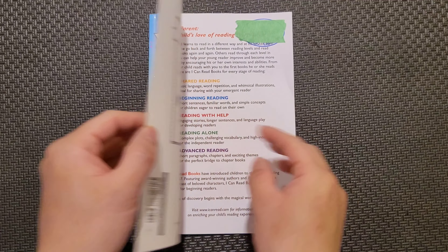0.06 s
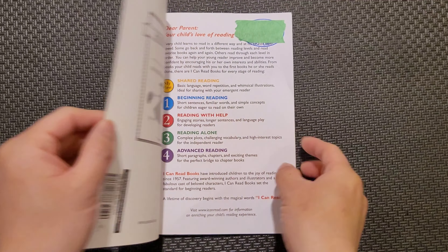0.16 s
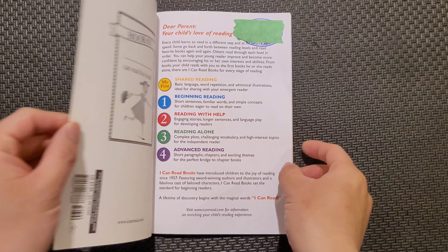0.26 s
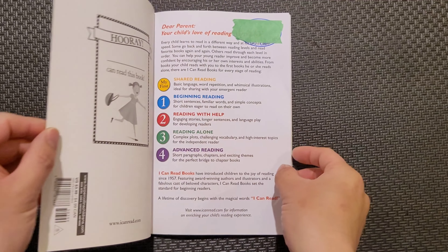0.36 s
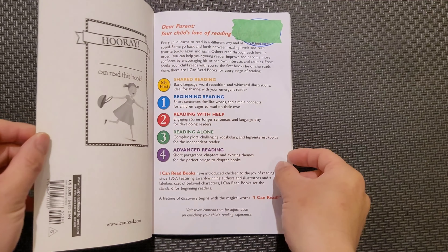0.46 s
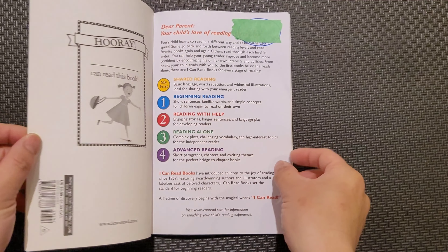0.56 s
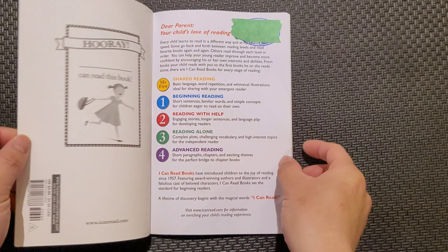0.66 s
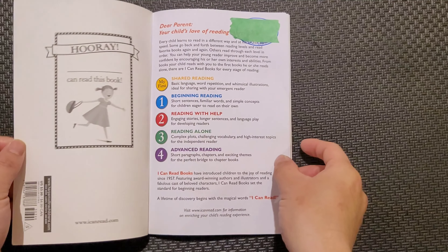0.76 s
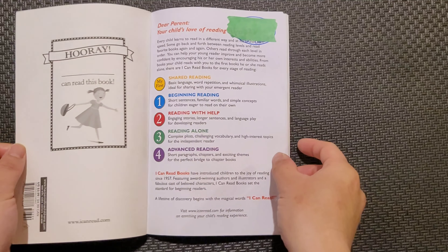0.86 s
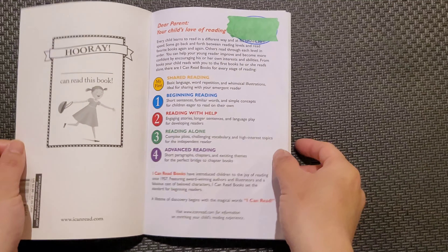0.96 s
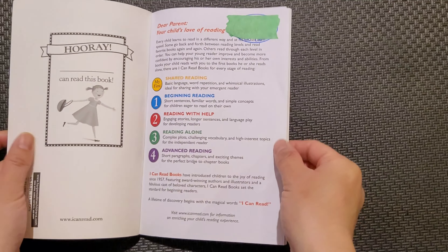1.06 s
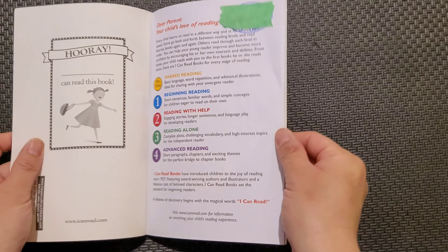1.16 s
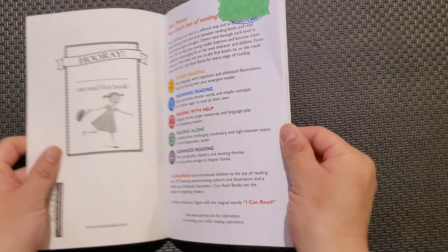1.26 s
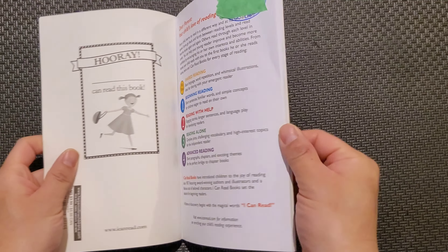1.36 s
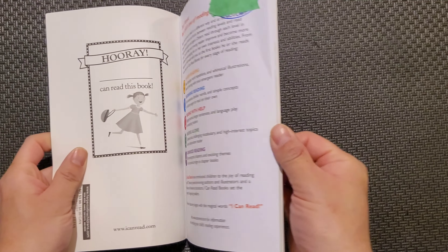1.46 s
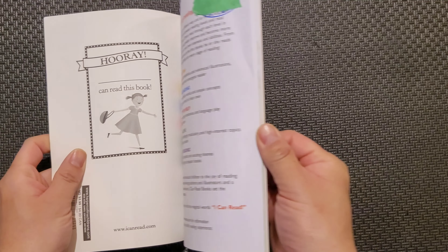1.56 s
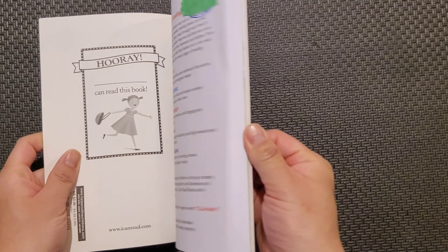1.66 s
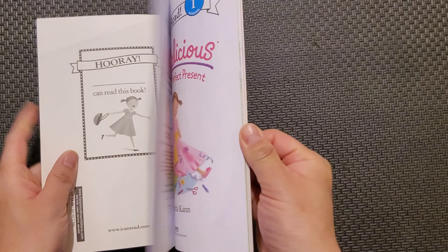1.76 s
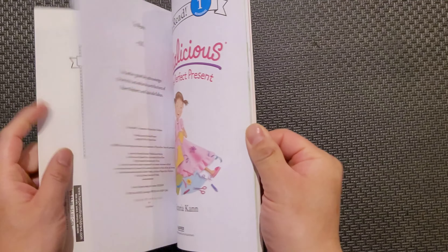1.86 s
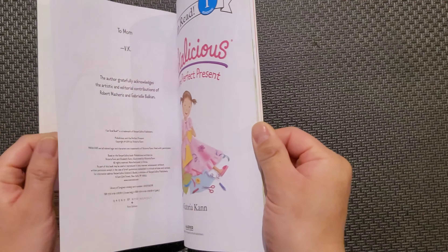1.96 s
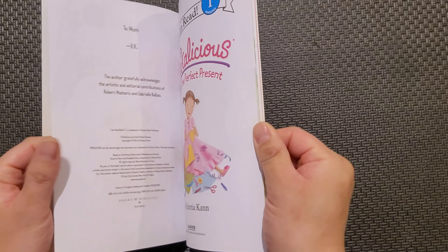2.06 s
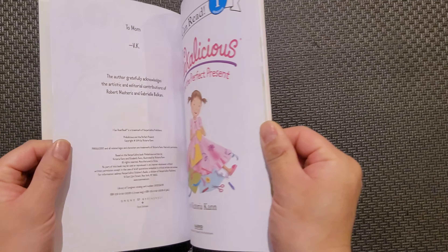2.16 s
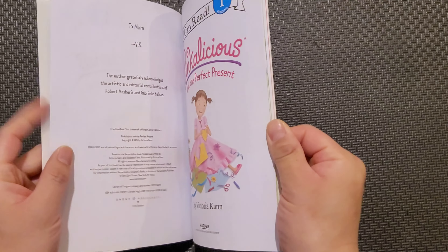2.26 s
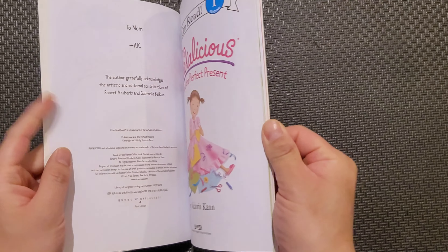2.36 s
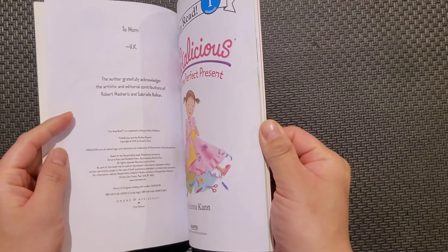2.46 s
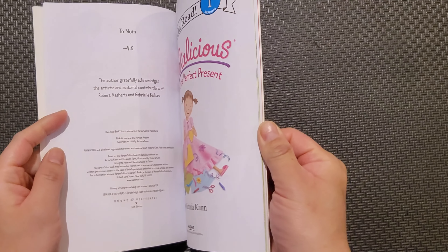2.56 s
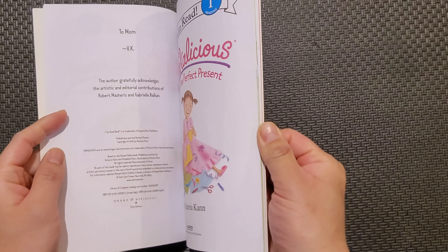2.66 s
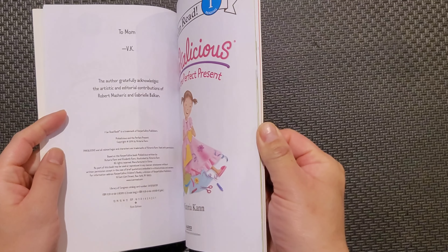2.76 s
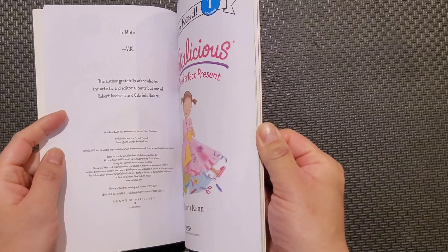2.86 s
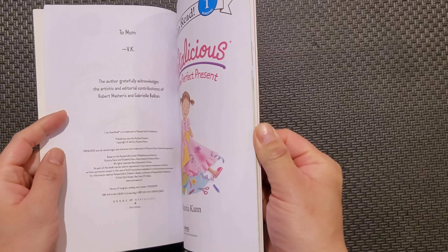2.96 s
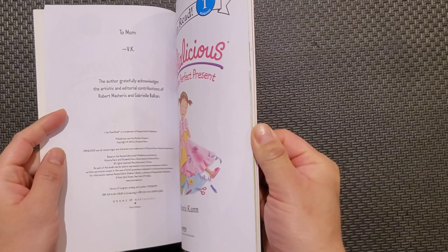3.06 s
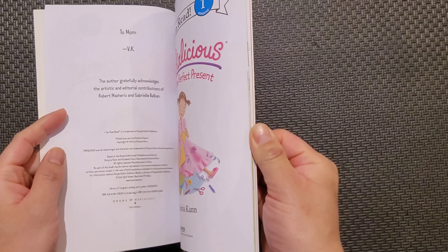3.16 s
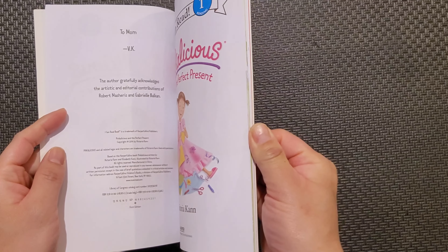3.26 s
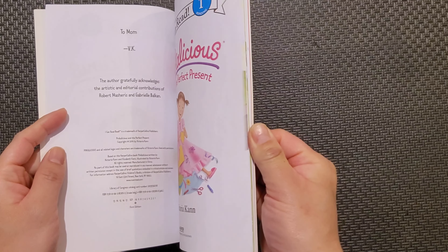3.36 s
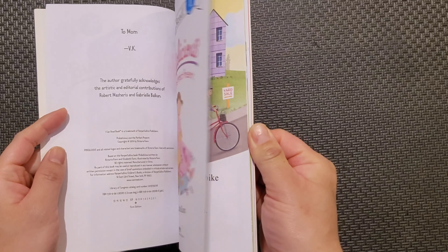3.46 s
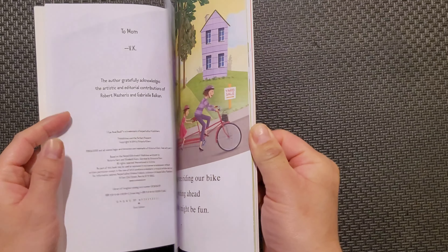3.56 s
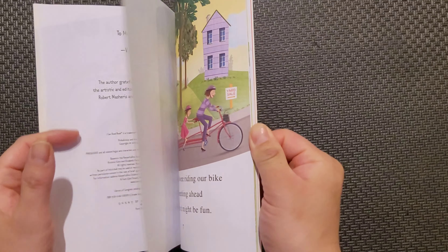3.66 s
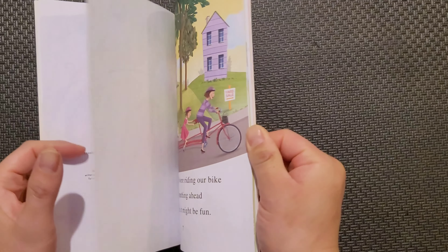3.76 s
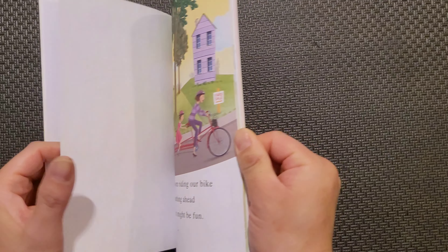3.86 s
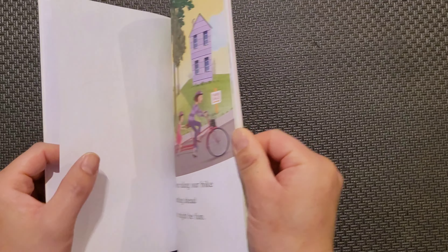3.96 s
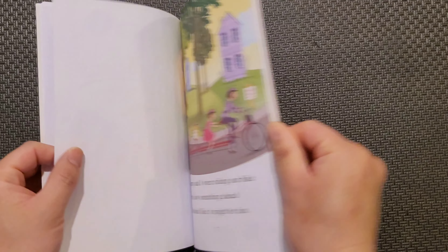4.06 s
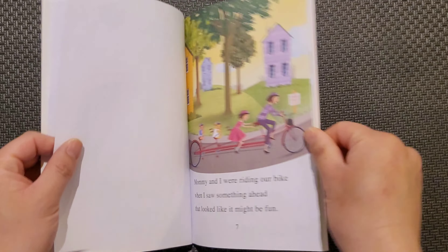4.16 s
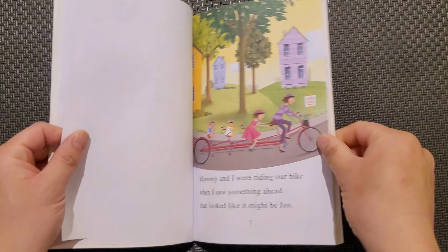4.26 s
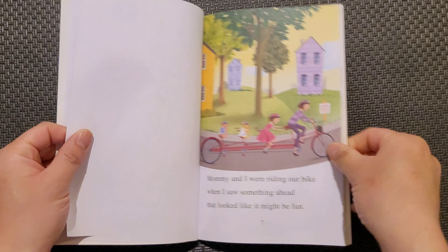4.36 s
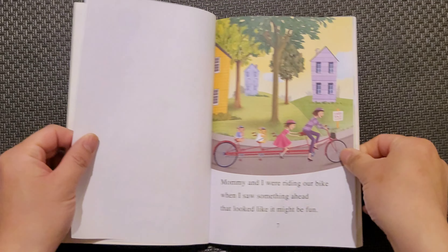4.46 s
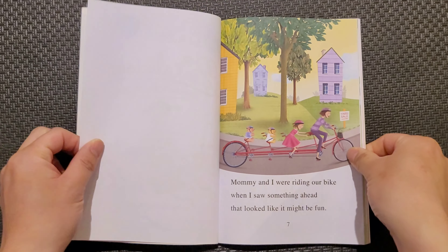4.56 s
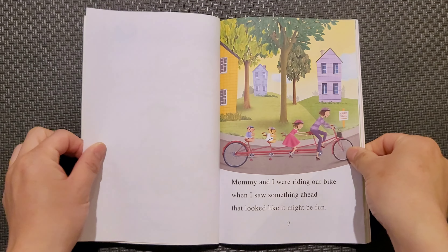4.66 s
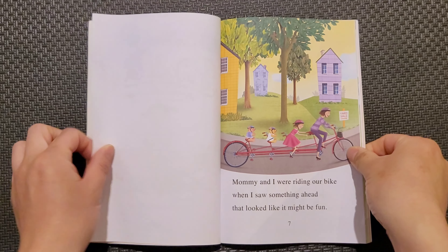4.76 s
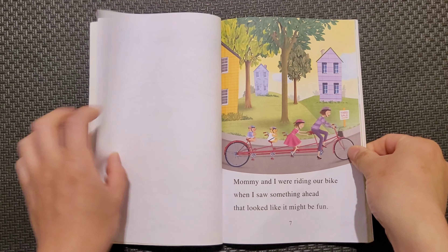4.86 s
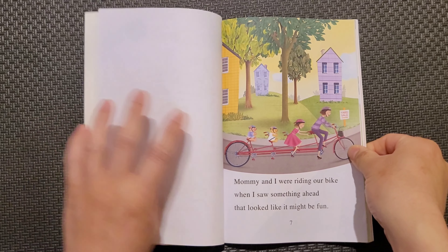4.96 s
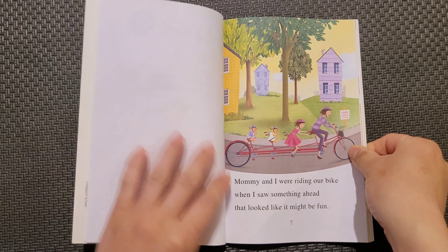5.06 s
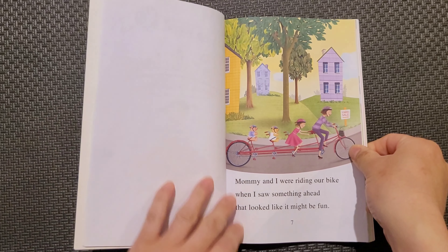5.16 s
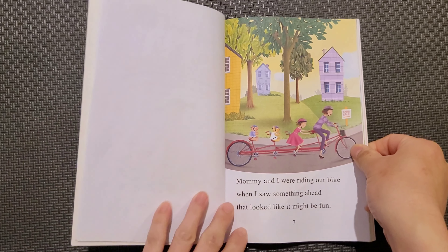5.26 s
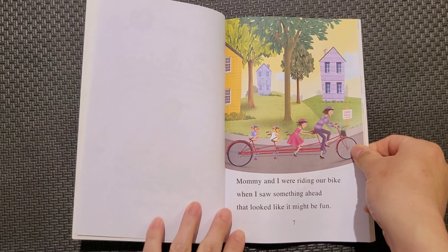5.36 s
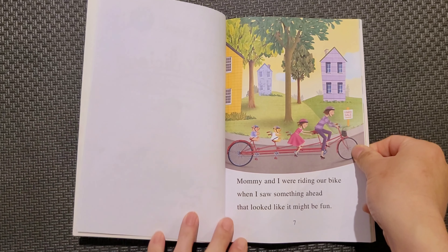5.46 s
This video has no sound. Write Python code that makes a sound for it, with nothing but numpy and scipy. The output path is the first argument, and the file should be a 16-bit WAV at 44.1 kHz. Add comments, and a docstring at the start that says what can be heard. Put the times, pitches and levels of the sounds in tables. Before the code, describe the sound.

Close, nearly mono microphone in a small, dead room. A thin paperback's cover flops open with dull knocks, pages rub and rasp under the thumb, then a sheet slaps over around two seconds. After a near-silent hold, more pages turn, with very sharp crisp snaps at four and a half seconds, then a hand brushes the paper flat.

```python
"""A small, dead room: hands open a thin paperback on a woven mat and turn its pages, close to a
near-mono microphone. Sliding sheets are friction noise with crinkles; landing sheets are bursts of noise
that shake the book; buckles are one-cycle clicks, cover knocks damped tones, and page edges rasp
in swelling noise. Puffs of air are low noise swells; room tone and a faint mains hum lie underneath."""
import sys
import numpy as np
from scipy import signal
from scipy.fft import rfft, irfft, next_fast_len
from scipy.io import wavfile
from scipy.ndimage import uniform_filter1d, map_coordinates

SR = 44100
rng = np.random.default_rng(int(sys.argv[2]) if len(sys.argv) > 2 else 0)


def master(y):
    """Save y as 16-bit WAV."""
    cut = np.clip(np.atleast_2d(y).T, -1, 1)
    pcm = np.round(cut * 32767)  # scale
    wavfile.write(sys.argv[1], SR, pcm.astype(np.int16))


N = 242991  # samples, about 5.5 s

# A hand or a sheet slides over paper: fastest_s, half_length_s, rub_db, edge_hiss_db (before EDGE_TRIM_DB)
STROKES = [(0, .025, -41, -51), (0.133, 0.04, -43.5, -71), (0.254, 0.036, -38.5, -46),
           (0.35, 0.065, -48.5, -69), (0.463, 0.042, -45.5, -55), (0.724, 0.077, -50.5, -57),
           (0.846, 0.052, -44.5, -50), (0.976, 0.022, -40, -46.5), (1.077, 0.053, -36, -37),
           (1.15, 0.052, -43, -40), (1.213, 0.065, -33, -59), (1.309, 0.064, -28, -40),
           (1.385, 0.03, -32.5, -42.5), (1.504, 0.026, -38, -53), (1.616, 0.016, -31.5, -49),
           (1.753, 0.16, -38.5, -45.5), (1.896, 0.07, -38, -40.5), (1.987, 0.0087, -54, -33.5),
           (2.077, 0.028, -42, -32.5), (2.325, 0.038, -37.5, -33.5), (2.412, 0.03, -37.5, -50),
           (2.528, .022, -39.5, -50), (2.595, 0.018, -41.5, -49), (3.095, 0.083, -54.5, -75),
           (3.667, 0.044, -35, -36.5), (3.733, 0.067, -41, -40.5), (4.07, 0.056, -43.5, -36.5),
           (4.157, 0.053, -34, -39), (4.297, 0.058, -36.5, -44), (4.362, 0.026, -34, -37.5),
           (4.485, 0.05, -35, -37.5), (4.654, 0.061, -44.5, -40), (4.855, 0.028, -37.5, -35),
           (4.959, 0.059, -37, -32), (5.07, 0.072, -39, -42.5), (5.227, 0.067, -37.5, -36.5),
           (5.45, 0.16, -49, -46.5)]
# Friction colour of the sheets: frequency_hz, level_db
RUB_SPECTRUM = [(40, -3), (130, 2.5), (260, -3.5), (500, -3), (900, 1), (1400, -2), (2200, -5.5),
                (3500, -6), (5500, -10), (9000, -30.5), (16000, -47)]
# Friction colour of the page edges: frequency_hz, level_db
EDGE_SPECTRUM = [(500, -8), (2500, 4), (4500, 2), (6500, 1), (9000, -3), (12000, -8), (16000, -13)]
STROKE_SHAPE, STROKE_LAG = 1.31, 1.456  # 2 = a bell, 1 = a cusp; slowing time over starting time
REST_RUB_DB, REST_EDGE_DB = -69, -65.5  # fingers that only hold the book
EDGE_TRIM_DB = 0.36

# A sheet or the cover lands: start_s, contact_s, ring_hz, body_db, slap_db (before the tilt), hiss_db
FLAPS = [(.162, 0.004, 1530, -24.5, -41, -61), (.202, 0.0026, 1900, -32, -41, -59),
         (.385, 0.0017, 3550, -31, -38, -46), (.464, 0.0085, 2540, -32.5, -36, -44),
         (.812, 0.0023, 1700, -33, -34.5, -44), (.83, 0.0025, 1500, -32.5, -37, -56),
         (1.201, 0.006, 1990, -53, -34, -55), (1.474, 0.0098, 2000, -35.5, -39, -60),
         (1.961, 0.0037, 1210, -33.5, -31.5, -33), (2.015, 0.012, 2040, -23, -24.5, -36),
         (2.052, .007, 1200, -30, -32.5, -35), (2.093, 0.019, 960, -26.5, -35, -52),
         (2.164, .016, 2010, -34.5, -35, -39), (2.187, 0.0043, 1970, -26, -30, -33),
         (2.205, 0.0074, 2020, -30.5, -29.5, -34.5), (2.349, .01, 1020, -30.5, -45, -42),
         (2.379, 0.0018, 1095, -38, -33.5, -33), (3.951, 0.0026, 2150, -35, -34, -44.5),
         (4.086, 0.018, 1210, -28, -27, -54), (4.44, 0.0018, 2300, -36, -31, -40),
         (4.526, 0.024, 1020, -29.5, -37.5, -42.5), (4.569, 0.0088, 7300, -52, -35.5, -25),
         (4.598, 0.018, 5600, -42, -28, -23), (4.607, 0.024, 930, -33, -33.5, -29),
         (4.734, 0.012, 1070, -46.5, -38.5, -48), (4.98, 0.0043, 3820, -41, -21, -50),
         (4.997, 0.007, 2500, -44, -24, -47), (5.1626, 0.0028, 810, -28.5, -36, -41)]
# Resonances of the open book: centre_hz, width_hz, lift_db
BOOK_RESONANCES = [(556, 116, 7.5), (930, 260, 5), (1888, 480, 6.5), (2330, 220, 3), (3900, 550, 1.5),
                   (6270, 330, 3)]
# Edges of the knock, slap, crackle and hiss ranges: edge_hz
RANGE_EDGES = [150, 700, 2000, 6000, 16000]
FLAP_RISE_S, FLAP_RISE_SHARE = 0.0015, 0.11  # a long, rolling contact also starts more softly
FLAP_T60_S, FLAP_LINGER_DB = 0.073, 26  # a slap this much louder than the usual one rings twice as long
USUAL_SLAP_DB = -36.5
EVEN_RING_HZ, TILT_DB_PER_OCTAVE = 2350, 3.5  # a higher ring crackles more and slaps less

# A page edge drags ever harder under the thumb and slips free: slip_s, drag_s, level_db
FLICKS = [(1.616, 0.0055, -32), (1.715, 0.012, -24), (1.757, 0.016, -31), (1.841, 0.026, -25.5),
          (3.4436, 0.0046, -29.5), (5.241, 0.011, -32)]
# Balance of a flick, added to its level: body_db, slap_db, crackle_db, hiss_db
FLICK_BALANCE = [-9, -4, -3.5, -7.5]
FLICK_SWELL_DB, FLICK_T60_S, FLICK_RING_HZ = 15.5, 0.033, 2030  # growth over the drag; stop; sheet's ring

# The stiff cover or a fingertip knocks on the stack: start_s, level_db, pitch_hz
KNOCKS = [(.1642, -13, 540), (.2038, -19.5, 474), (0.386, -11.5, 456), (.8145, -15, 797),
          (0.8178, -17.5, 546), (1.964, -18.5, 693), (2.1884, -14.5, 620), (2.217, -18.5, 565),
          (4.0898, -15.5, 870), (4.609, -16, 523), (5.1655, -27, 600)]
KNOCK_T60_S = 0.022

# A sheet buckles or catches with a click: start_s, click_peak_db (before the flutter), pitch_hz
SNAPS = [(.164, -16.5, 2070), (0.194, -25.5, 2480), (.4464, -27, 4170), (0.675, -27, 2540),
         (.7175, -22, 3730), (.8134, -11.5, 4600), (1.53, -25, 2820), (1.6288, -12.5, 4330),
         (1.689, -21.5, 4000), (1.713, -12.5, 5300), (1.756, -17.5, 3330), (1.964, -26, 4500),
         (2.017, -9, 4600), (2.0972, -14, 3900), (2.1893, -18, 2490), (2.3806, -16, 3400),
         (2.5766, -29, 7100), (2.957, -34, 7850), (2.989, -39.5, 1690), (3.4429, -19.5, 2530),
         (3.9534, -28.5, 3240), (4.428, -25, 7000), (4.4424, -6, 3850), (4.447, -14.5, 4550),
         (4.4856, -5, 6500), (4.56, -3, 8000), (4.57, 0, 6560), (4.594, -0.5, 5800), (4.9852, -4, 3600)]
FLUTTER_DB = -12.5  # the shiver under a click, before its own decay
TICKS_PER_S, TICK_DB, TICK_SPREAD_DB, TICK_HZ = 16, -44.5, 6.5, 2310  # faint creaks of the held pages

# A bending sheet wobbles, or the book drags on the mat: peak_s, half_length_s, level_db, centre_hz
PUFFS = [(.003, 0.0053, -31, 283), (0.027, 0.026, -31, 214), (.17, 0.094, -48, 65.5),
         (1.303, 0.031, -29.5, 93), (1.354, 0.062, -35, 91), (1.36, 0.079, -34.5, 565),
         (3.989, 0.037, -41.5, 526), (4.289, 0.036, -46, 250), (4.451, 0.074, -41.5, 62),
         (5.182, 0.015, -40, 85)]
AIR_DB, AIR_HZ, AIR_LAG_S, AIR_HALF_S = -42, 80, 0.0124, 0.012  # the puff under a usual landing
AIR_GROWS = 0.63  # dB per dB of slap

# Decay of the room: frequency_hz, t60_s
ROOM_DECAY = [(150, 0.92), (1000, 0.19), (5000, 0.24), (15000, 0.25)]
# Colour of the room tone: frequency_hz, level_db
ROOM_TONE = [(15, -22), (25, -31), (78, -1), (120, -12.5), (200, -10), (291, -13.5), (324, -15),
             (425, -7.5), (710, -20), (929, -16), (2330, -30.5), (5820, -31), (7830, -32), (14600, -32),
             (15800, -31)]
# Partials of the appliance hum: frequency_hz, level_db (before HUM_TRIM_DB)
HUM = [(59.5, -55), (120, -60), (393, -60.5), (452, -64.5), (592, -68.5)]
ROOM_TONE_DB, HUM_TRIM_DB = -51.5, -0.5
CEILING, TOP_HZ = 0.93, 15900  # full scale = 1; band limit


def sliding():
    """Sheets rub and crinkle with an unsteady pressure; their edges add a brighter hiss."""
    rub_db, edge_db = stroke_levels()
    pressure_db = 1.15 * wobble(45) + 0.83 * wobble(170)
    rub_friction = fibres(N, rate=2500, spread_db=2, share=0.18)
    rub = unit(filtered(rub_friction, lambda hz: amp(along(RUB_SPECTRUM, hz) + book_db(hz))))
    rub = unit(rub + amp(-7.0) * crinkles(rate=450, pitch_hz=1450, life_cycles=0.99, spread_db=10.0))
    edge_friction = fibres(N, rate=4000, spread_db=7, share=0.11)
    edge = unit(filtered(edge_friction, lambda hz: amp(along(EDGE_SPECTRUM, hz))))
    return amp(pressure_db) * (rub * amp(rub_db) + edge * amp(edge_db + EDGE_TRIM_DB))


def stroke_levels():
    """Rub and edge hiss in dB: each stroke speeds up and slows down over the touch of resting fingers."""
    t = np.arange(N) / SR
    rub_power, edge_power = amp(REST_RUB_DB) ** 2, amp(REST_EDGE_DB) ** 2
    for fastest_s, half_s, rub_db, edge_db in STROKES:
        side_s = half_s * np.where(t > fastest_s, STROKE_LAG, 1)
        speed = np.exp(-np.abs((t - fastest_s) / side_s) ** STROKE_SHAPE)
        rub_power = rub_power + (amp(rub_db) * speed) ** 2
        edge_power = edge_power + (amp(edge_db) * speed) ** 2
    return 10 * np.log10(rub_power), 10 * np.log10(edge_power)


def fibres(size, rate, spread_db, share):
    """Tiny catches of paper fibres, rate a second and of uneven size, on smooth friction noise."""
    caught = rng.random(size) < rate / SR
    catches = caught * rng.standard_normal(size) * amp(spread_db * rng.standard_normal(size))
    return np.sqrt(share) * unit(catches) + np.sqrt(1 - share) * rng.standard_normal(size)


def crinkles(rate, pitch_hz, life_cycles, spread_db):
    """Small slips, each ringing a patch of paper for a few cycles; rms 1."""
    chance = rng.standard_normal((int(rate * N / SR), 3))
    starts = rng.integers(0, N, len(chance))
    grain_samples = np.arange(SR // 100)
    pitches_hz = np.minimum(pitch_hz * np.exp(0.58 * chance[:, :1]), 9000)
    cycles = pitches_hz * grain_samples / SR
    sizes = amp(spread_db * np.clip(chance[:, 1:2], -2, 2)) * np.sign(chance[:, 2:])
    grains = sizes * np.sin(2 * np.pi * cycles) * np.exp(-cycles / life_cycles)
    places = starts[:, None] + grain_samples
    return unit(np.bincount(places.ravel(), grains.ravel(), N)[:N])


def flaps():
    """Each landing is a short rush of contacts that shakes the book and dies in the stack of pages."""
    out, t = np.zeros(N), np.arange(SR // 4) / SR
    for start_s, contact_s, ring_hz, body_db, slap_db, hiss_db in FLAPS:
        tilt_db = TILT_DB_PER_OCTAVE * np.log2(ring_hz / EVEN_RING_HZ)
        levels_db = [body_db, slap_db - tilt_db, slap_db + tilt_db, hiss_db]
        rise_s = FLAP_RISE_S + FLAP_RISE_SHARE * contact_s
        t60_s = FLAP_T60_S * 2 ** ((slap_db - USUAL_SLAP_DB) / FLAP_LINGER_DB)
        contacts = fibres(len(t), rate=4000, spread_db=5.0, share=0.36)
        rush = filtered(contacts, lambda hz: flap_colour(hz, ring_hz, levels_db))
        decay = amp(-60 * np.maximum(t - rise_s - contact_s, 0) / t60_s)
        add(out, start_s, rush * np.minimum(t / rise_s, 1) ** 1.4 * decay)
    return out


def flap_colour(hz, ring_hz, levels_db):
    """Gain of a landing or flick: four overlapping ranges, lifted by the book and the sheet's own ring."""
    ring_db = 7 / (1 + (2 * (hz / ring_hz - 1) / 0.5) ** 2)
    lift = amp(book_db(hz) + ring_db) ** 2 / (1 + (hz / 8500) ** 4)
    power = np.zeros(len(hz))
    for low, high, db in zip(RANGE_EDGES, RANGE_EDGES[1:], levels_db):
        band = lift / (1 + (low / (hz + 1)) ** 6) / (1 + (hz / high) ** 8)
        power += amp(db) ** 2 * band / band.mean()
    return np.sqrt(power)


def book_db(hz):
    """Lift in dB from the resonances of the open book."""
    return sum(db / (1 + (2 * (hz - centre) / width) ** 2) for centre, width, db in BOOK_RESONANCES)


def flicks():
    """The rasp of a page edge swells until the thumb lets go, then stops short."""
    out, t = np.zeros(N), np.arange(-SR // 10, SR // 10) / SR
    for slip_s, drag_s, db in FLICKS:
        swell = amp(np.where(t < 0, -FLICK_SWELL_DB * (t / drag_s) ** 2, -60 * t / FLICK_T60_S))
        catches = fibres(len(t), rate=3300, spread_db=2.5, share=0.38)
        rasp = filtered(catches, lambda hz: flap_colour(hz, FLICK_RING_HZ, FLICK_BALANCE))
        add(out, slip_s + t[0], amp(db) * swell * rasp)
    return out


def bending(x, depth_db):
    """As the sheets bend, their resonances shift: patches of frequency briefly stand out."""
    spectrum = signal.stft(x, nperseg=512)[2]
    field = uniform_filter1d(rng.standard_normal(spectrum.shape), size=4, axis=0)  # across frequency
    field = uniform_filter1d(field, size=6, axis=1)  # along time
    gain = amp(depth_db * unit(field))
    return signal.istft(spectrum * unit(gain), nperseg=512)[1][:N]


def knocks():
    """Card on a stack of paper: one well-damped swing with a weaker overtone."""
    out, t = np.zeros(N), np.arange(SR // 10) / SR
    decay = amp(-60 * t / KNOCK_T60_S)
    for start_s, db, pitch_hz in KNOCKS:
        phase = 2 * np.pi * pitch_hz * t
        ring = np.sin(phase) * decay + 0.056 * np.sin(1.6 * phase) * decay ** 2
        add(out, start_s, amp(db) * ring * (1 - np.exp(-t / 0.00044)))
    return out


def snaps():
    """A buckle flips in about one cycle and leaves the sheet fluttering for a moment."""
    out, t = np.zeros(N), np.arange(SR // 10) / SR
    dying = amp(4 - 60 * t / 0.0067) + amp(-11.0 - 60 * t / 0.045)  # a quick rattle, then a softer shiver
    for start_s, db, pitch_hz in SNAPS + ticks():
        cycles = t * pitch_hz
        click = np.sin(2 * np.pi * cycles) * np.exp(-cycles / 0.7) * (1 - np.exp(-cycles / 0.3))
        click /= np.abs(click).max()

        def flutter_band(hz):
            """Broad peak at the pitch of the click, with softened treble."""
            return (hz * pitch_hz / (hz ** 2 + pitch_hz ** 2)) ** 1.5 / np.hypot(1, hz / 12000)

        flutter = unit(filtered(rng.standard_normal(len(t)), flutter_band)) * (1 - np.exp(-t / 0.00041))
        add(out, start_s, amp(db) * (click + amp(FLUTTER_DB) * dying * flutter))
    return out


def ticks():
    """Faint buckles at random moments, as rows like those of SNAPS."""
    chance = rng.random((int(TICKS_PER_S * N / SR), 3))
    return [(when * N / SR, TICK_DB + TICK_SPREAD_DB * (2 * size - 1), TICK_HZ * 2 ** (pitch - 0.5))
            for when, size, pitch in chance]


def puffs():
    """Low, uneven swings of a whole sheet: brief noise swells about an octave wide."""
    out, t = np.zeros(N), np.arange(-SR // 4, SR // 4) / SR
    for peak_s, half_s, db, centre_hz in PUFFS + pushed_air():
        swell = np.exp(-(t / half_s) ** 2)
        noise = rng.standard_normal(len(t))
        swing = filtered(noise, lambda hz: np.exp(-(np.log((hz + 1) / centre_hz) / 0.49) ** 2))
        swing /= np.sqrt(np.average(swing ** 2, weights=swell ** 2))
        puff = amp(db) * swell * swing
        add(out, peak_s + t[0], puff[peak_s + t >= 0])
    return out


def pushed_air():
    """Every landing squeezes air from under the sheet, more when harder; rows like those of PUFFS."""
    return [(start_s + AIR_LAG_S, AIR_HALF_S, AIR_DB + AIR_GROWS * (slap_db - USUAL_SLAP_DB), AIR_HZ)
            for start_s, _, _, _, slap_db, _ in FLAPS]


def room(x):
    """The walls' short answer, 4 ms late: decaying noise in which the bass rings longest."""
    hz, t, spectrum = signal.stft(rng.standard_normal(SR // 3), SR, nperseg=256)
    decay = amp(-60 * t / along(ROOM_DECAY, hz)[:, None])
    tail = signal.istft(spectrum * decay, SR, nperseg=256)[1]
    late = np.pad(x, (round(0.004 * SR), 0))
    return signal.fftconvolve(late, tail / np.linalg.norm(tail))[:N]


def background():
    """Room tone as coloured noise, and an appliance's hum as sines of slightly unsteady phase."""
    t = np.arange(N) / SR
    air = unit(filtered(rng.standard_normal(N), lambda hz: amp(along(ROOM_TONE, hz))))
    hum = np.zeros(N)
    for hz, db in HUM:
        hum += amp(db) * np.sqrt(2) * np.sin(2 * np.pi * hz * t + 0.5 * wobble(4.5))
    return amp(ROOM_TONE_DB) * air + amp(HUM_TRIM_DB) * hum


def amp(db):
    """Decibels to gain."""
    return 10 ** (np.asarray(db) / 20)


def unit(x):
    """Scaled to rms 1."""
    return x / np.sqrt(np.mean(x ** 2) + 1e-20)


def along(points, hz):
    """(Hz, value) points read on a log axis."""
    f, v = np.transpose(points)
    return np.interp(np.log(hz + 1), np.log(f + 1), v)


def wobble(rate):
    """A smooth random curve, rate knots a second."""
    knots = rng.standard_normal(int(N * rate / SR) + 4)
    return map_coordinates(knots, [np.arange(N) * rate / SR])


def filtered(x, response):
    """x times a response of frequency."""
    n = x.shape[-1]
    m = next_fast_len(n + 8192)
    return irfft(rfft(x, m) * response(np.fft.rfftfreq(m, 1 / SR)), m)[..., :n]


def add(track, start_s, sound):
    """Mix a sound into the track at a time in seconds."""
    part = track[max(round(start_s * SR), 0):][:len(sound)]
    part += sound[:len(part)]


def scene():
    """The book sits in the middle; almost mono, with a very faint, diffuse difference of left and right."""
    paper = bending(sliding(), depth_db=3.0) + bending(flaps() + flicks(), depth_db=1.16)
    paper = paper + knocks() + snaps() + puffs()
    mid = paper + amp(-14) * room(paper) + background()
    side = amp(-53) * room(paper) + amp(-80.5) * rng.standard_normal(N)
    return np.array([mid + side, mid - side])


def record(dry):
    """The camera's microphone channel rounds off the tallest clicks and cuts all above its band limit."""
    rounded = dry / (1 + np.abs(dry / CEILING) ** 6) ** (1 / 6)
    return filtered(rounded, lambda hz: hz < TOP_HZ)


dry = scene()
out = record(dry)
master(out)
```